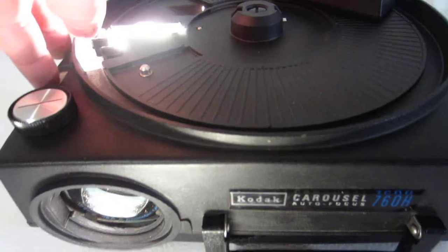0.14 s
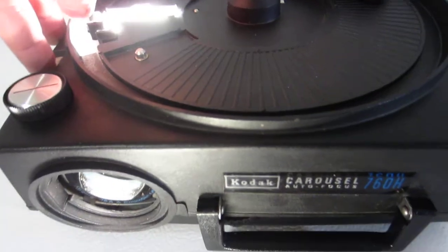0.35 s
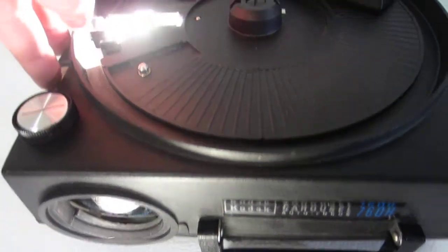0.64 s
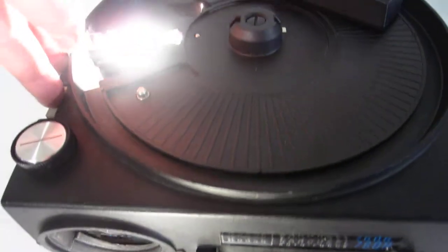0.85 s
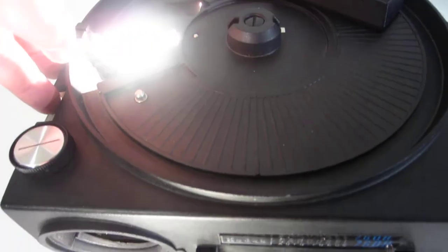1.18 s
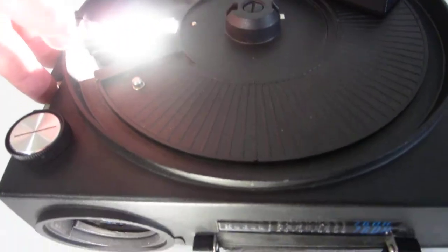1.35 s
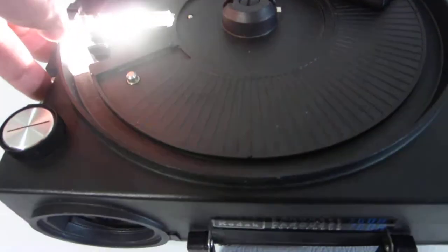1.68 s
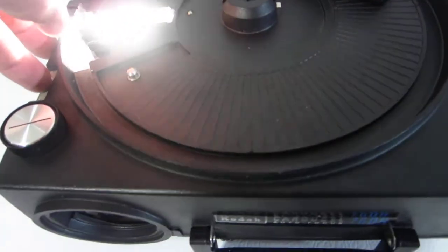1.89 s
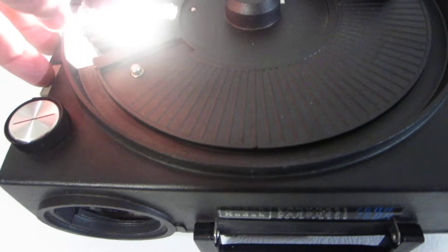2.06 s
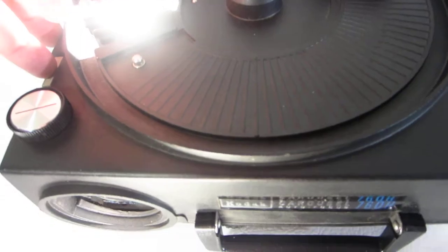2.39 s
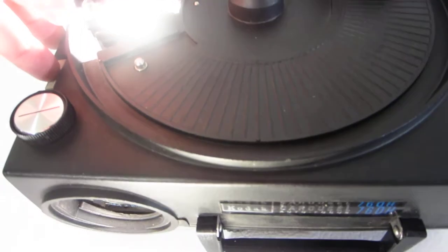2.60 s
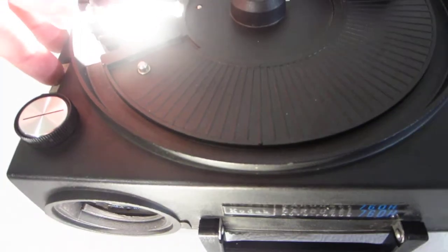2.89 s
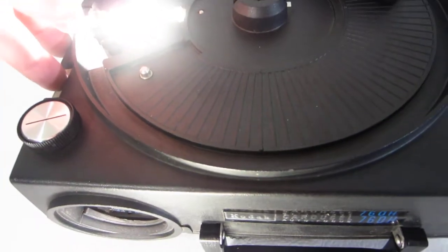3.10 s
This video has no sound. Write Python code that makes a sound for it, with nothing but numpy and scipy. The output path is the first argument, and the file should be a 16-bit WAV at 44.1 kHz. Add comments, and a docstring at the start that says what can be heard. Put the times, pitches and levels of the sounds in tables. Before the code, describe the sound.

Running slide projector with fan rush, hum and fast ticking, and two sharp slide-change clacks.

```python
"""A small room, close to a running slide projector: the fan rushes, the motor hums and the drive ticks
about 13 times a second. One slide change: the slide scrapes up its slot and the lift arm clacks, then
the tray pawl snaps, the next slide drops into the gate and a spring rings on. The linkage squeaks twice.
Each clack is a cluster of hard contacts that jolt, rattle and ring a small part."""
import sys
import numpy as np
from scipy import signal
from scipy.fft import rfft, irfft, next_fast_len
from scipy.io import wavfile
from scipy.ndimage import map_coordinates

SR = 44100
rng = np.random.default_rng(int(sys.argv[2]) if len(sys.argv) > 2 else 0)


def wav_record(signal):
    """Record a signal, one row per channel, as 16-bit PCM in the file named by sys.argv[1]."""
    frames = np.transpose(np.atleast_2d(signal))
    bounded = np.clip(frames, -1, 1)
    # unit amplitude maps onto the largest positive 16-bit level
    quanta = np.round(bounded * 32767).astype(np.int16)
    wavfile.write(sys.argv[1], SR, quanta)


N = 142884
TIME = np.arange(N) / SR
TAIL_TIME = np.arange(SR // 2) / SR  # clock of one hit or echo
HIT_SAMPLES = SR // 100


def amp(db):
    """Decibels to gain."""
    return 10 ** (np.asarray(db) / 20)


def unit(x):
    """Scale to rms 1."""
    return x / np.sqrt(np.mean(x ** 2) + 1e-20)


def unit_hit(x):
    """Scale a short sound to the energy of 10 ms at rms 1."""
    return x * np.sqrt(HIT_SAMPLES / np.sum(x ** 2))


def along(points, hz):
    """Read a curve of (frequency, value) points on a log axis."""
    freqs, values = np.transpose(points)
    return np.interp(np.log(hz + 1), np.log(freqs + 1), values)


def wobble(rate):
    """A smooth random curve, rate knots a second."""
    return map_coordinates(rng.standard_normal(2048), [TIME * rate], mode="wrap")


def filtered(x, response):
    """EQ x with a gain that is a function of frequency."""
    size = next_fast_len(N + SR // 2)
    return irfft(rfft(x, size) * response(np.fft.rfftfreq(size, 1 / SR)), size)[..., :N]


def impulse(colour, dull_hz=SR, size=4096):
    """A minimum-phase click with this colour, rolled off above dull_hz."""
    hz = np.fft.rfftfreq(size, 1 / SR)
    cepstrum = irfft(np.log(amp(along(colour, hz)) / np.hypot(1, (hz / dull_hz) ** 2)))
    cepstrum[1:size // 2] *= 2
    cepstrum[size // 2 + 1:] = 0
    return irfft(np.exp(rfft(cepstrum)))


def add(track, start_s, x):
    """Mix x into track at start_s."""
    part = track[max(0, round(start_s * SR)):][:len(x)]
    part += x[:len(part)]


# stereo lean (frequency [Hz], left over right [dB])
BALANCE = [(110, 1), (400, -1.6), (750, -2), (1290, 0.3), (2200, 2.5), (4400, 3), (9000, 3)]
def placed(x):
    """Pan by frequency: treble leans to the left, the low mids to the right."""
    return filtered(x, lambda hz: amp(along(BALANCE, hz) * np.array([[.5], [-.5]])))


# stereo focus of the noise (frequency [Hz], left-right correlation [ratio])
CORRELATION = [(60, 0.5), (130, 0.094), (290, 0.8), (640, 0.97), (1410, 0.72), (3100, 0.44), (6820, 0.21)]
def rush(colour):
    """Coloured stereo noise of rms 1, wide in some bands and centred in others."""
    def mid_side_gains(hz):
        angle = np.arccos(np.clip(along(CORRELATION, hz), -1, 1)) / 2
        return amp(along(colour, hz)) * [np.cos(angle), np.sin(angle)]
    mid, side = filtered(rng.standard_normal((2, N)), mid_side_gains)
    return unit(np.array([mid + side, mid - side]))


# the room's decay (frequency [Hz], t60 [s])
ROOM_DECAY = [(200, .4), (1500, .46), (3500, .24), (12000, .15)]
def room(x, width=.36, rise_s=.009):
    """Short reverb of the small room: the treble dies first."""
    hz, t, noise = signal.stft(rng.standard_normal((2, len(TAIL_TIME))), SR, nperseg=256)
    decay = amp(-60 * t / along(ROOM_DECAY, hz)[:, None])
    echoes = signal.istft(noise * decay, SR, nperseg=256)[1][:, :len(TAIL_TIME)]
    mid, side = echoes * (1 - np.exp(-TAIL_TIME / rise_s))
    tail = np.array([mid + width * side, mid - width * side])
    return signal.fftconvolve(x[None], tail / np.linalg.norm(tail[0]), axes=1)[:, :N]


def housing_resonances(x, ripple_db=2.5, spacing_hz=44.37):
    """The housing's many narrow resonances colour the sound with peaks and dips."""
    knots = rng.standard_normal(2048)
    ripple = lambda hz: amp(ripple_db * map_coordinates(knots, [hz / spacing_hz], mode="wrap"))
    return unit(filtered(x, ripple))


# the fan's low rush and the hiss on top (frequency [Hz], level [dB])
AIR_COLOUR = [(22, -23), (45, -21), (70, -16.5), (108, -8.5), (200, -9), (345, -4.5), (500, -1),
              (600, -4.5), (850, -5), (1350, -12.5), (1550, -22), (3400, -120)]
HISS_COLOUR = [(1000, -27), (1550, 0.5), (1950, 3.5), (2400, -4.5), (3100, -9.5), (3800, -13), (5000, -20),
               (7600, -20), (9000, -29), (11000, -37.5)]
def fan(air_db=-38, hiss_db=-52, flutter_db=.4):
    """A bed of fluttering air, with a thin hiss coloured by the housing."""
    air = amp(air_db + flutter_db * wobble(24.43)) * rush(AIR_COLOUR)
    hiss = amp(hiss_db) * housing_resonances(rush(HISS_COLOUR))
    return placed(air + hiss)


# motor and fan tones (frequency [Hz], level [dB])
HUM_TONES = [(42.5, -63), (106, -62.5), (241, -53.5), (296, -58), (351, -54), (418, -51.5), (481, -52),
             (838, -53)]
def motor_hum(waver_db=2.5, drift_rad=1.06, top_flutter_rad=.55):
    """Motor and fan hum in slightly unsteady tones; the higher ones flutter more."""
    hum = np.zeros(N)
    for hz, db in HUM_TONES:
        rms = amp(db + waver_db * wobble(5.96))
        phase = 2 * np.pi * (hz * TIME + rng.random()) + drift_rad * wobble(7.26)
        flutter = top_flutter_rad * hz / HUM_TONES[-1][0] * wobble(30.05)
        hum += rms * np.sqrt(2) * np.sin(phase + flutter)
    return placed(hum)


# the drive's pulse (time [s], level [dB])
TICKS = [(0.0084, -36.5), (0.0826, -37), (0.1598, -39), (0.242, -39.5), (0.3185, -37), (0.394, -38),
         (0.465, -38.5), (0.539, -39.5), (0.62, -41), (0.6989, -37.5), (0.7739, -38), (0.849, -40.5),
         (0.9224, -42), (0.999, -43), (1.0775, -40.5), (1.1536, -38.5), (1.2286, -40.5), (1.3026, -42),
         (1.3765, -42), (1.535, -41), (1.6092, -38), (1.685, -40.5), (1.7594, -41.5), (1.835, -41.5),
         (1.912, -40.5), (1.9885, -38.5), (2.0641, -38.5), (2.214, -39.5), (2.288, -41.5), (2.367, -40.5),
         (2.4448, -38.5), (2.5207, -39.5), (2.597, -40), (2.671, -42), (2.747, -44), (2.8247, -41),
         (2.9007, -38), (2.9756, -38.5), (3.051, -42.5), (3.123, -43), (3.1993, -42.5)]
# touch, strike and bounce within a tick (delay [s], level [dB])
TICK_CONTACTS = [(-.0014, -13), (0, 0), (.0022, -7)]
# a tick's knock and its bright rattle (frequency [Hz], level [dB])
KNOCK_COLOUR = [(500, -24), (1900, -5), (2600, 4.5), (3150, 6), (3650, -10), (7000, -55)]
RATTLE_COLOUR = [(1500, -28), (4200, -1.5), (5600, 5.5), (7300, -3), (8000, -10.5), (8900, -6),
                 (10000, -19.5), (15500, -38)]
# the ticks start a little duller (time [s], rattle trim [dB])
RATTLE_TRIM = [(.5, -5.5), (.8, -2.5)]
def drive(rattle_t60=.005, scatter_s=.0079, scatter_width_s=.0059, left_over_right_db=4.5):
    """A dry tick once a turn: the same knock with an ever-changing rattle, echoing inside the housing."""
    ticks = np.zeros(N)
    knock = amp(-7) * unit_hit(impulse(KNOCK_COLOUR))
    fizz = impulse(RATTLE_COLOUR)
    t = TAIL_TIME[:len(fizz)]
    for start, db in TICKS:
        rattle_gain = amp(-17.5 + np.interp(start, *np.transpose(RATTLE_TRIM)))
        for delay, contact_db in TICK_CONTACTS:
            force = rng.standard_normal(len(t)) * amp(-60 * t / rattle_t60)
            rattle = unit_hit(signal.fftconvolve(force, fizz)[:len(t)])
            tick = amp(db + contact_db) * (knock + rattle_gain * rattle)
            walls = rng.standard_normal(len(t)) * np.exp(-((t - scatter_s) / scatter_width_s) ** 2)
            at = start + delay * (1 + rng.normal(0, .04))
            add(ticks, at, tick)
            add(ticks, at, amp(-8) * signal.fftconvolve(tick, walls / np.linalg.norm(walls)))
    pan = amp([[left_over_right_db / 2], [-left_over_right_db / 2]])
    return (ticks + amp(-19) * room(ticks)) * pan


# swell of the scrape (time [s], level [dB])
SCRAPE_ENVELOPE = [(1.33, -71), (1.40, -60), (1.46, -54), (1.50, -91), (1.58, -72)]
# its papery tone (frequency [Hz], level [dB])
SCRAPE_COLOUR = [(500, -3), (2000, 2), (6000, 9.5), (9000, -1), (11000, -25)]
def slide_scrape():
    """The slide rubs up its slot with a faint, bright friction noise."""
    envelope = amp(np.interp(TIME, *np.transpose(SCRAPE_ENVELOPE), left=-120, right=-120))
    return placed(envelope * rush(SCRAPE_COLOUR))


# pivot squeaks (time [s], pitch [Hz], level [dB])
SQUEAKS = [(1.326, 1530, -33.5), (1.848, 1610, -34)]
def linkage_squeaks(width_s=.0039):
    """A pivot in the linkage squeaks: tiny blips of rough tone."""
    squeaks = np.zeros(N)
    for centre, hz, db in SQUEAKS:
        envelope = amp(db) * np.exp(-.5 * ((TIME - centre) / width_s) ** 2)
        squeaks += envelope * np.sin(2 * np.pi * hz * TIME + .5 * wobble(270))
    return placed(squeaks + amp(-15) * room(squeaks))


def spring(start_s=2.168, hz=4188, db=-52, t60=.76):
    """A spring rings on after the drop: one thin, high ping."""
    age = np.maximum(TIME - start_s, 0)
    return placed(amp(db - 60 * age / t60) * np.sin(2 * np.pi * hz * age))


def housing_scatter(x, spread=.6, above_hz=3500, t60=.015):
    """Scatter off the housing widens the treble."""
    walls = rng.standard_normal(len(TAIL_TIME)) * TAIL_TIME * amp(-60 * TAIL_TIME / t60)
    scatter = signal.fftconvolve(x, walls / np.linalg.norm(walls))[:N]
    side = spread * filtered(scatter, lambda hz: 1j * hz / (above_hz + 1j * hz))
    return np.array([x + side, x - side])


def clacks(contacts, colour, modes, jolt_db, ring_db, low_cut_hz=240):
    """Each contact is a jolt and a fast-dying rattle, and rings the part's modes."""
    hits = np.zeros(N)
    t = TAIL_TIME
    for start, db, rattle_t60, dull_hz in contacts:
        force = unit_hit(rng.standard_normal(len(t)) * amp(-60 * t / rattle_t60))
        force[0] += amp(jolt_db) * np.sqrt(HIT_SAMPLES)
        crack = unit_hit(signal.fftconvolve(force, impulse(colour, dull_hz))[:len(t)])
        ring = np.zeros(len(t))
        for hz, mode_db, t60 in modes:
            envelope = amp(mode_db + rng.normal(0, 1.3) - 60 * t / t60)
            ring += envelope / np.hypot(1, (hz / dull_hz) ** 2) * np.sin(2 * np.pi * hz * t)
        add(hits, start, amp(db) * (crack + amp(ring_db) * ring))
    # small parts radiate no bass
    hits = filtered(hits, lambda hz: (1j * hz / (low_cut_hz + 1j * hz)) ** 2)
    return placed(housing_scatter(hits) + amp(-12.5) * room(hits))


# pawl hits (time [s], level [dB], rattle t60 [s], dull above [Hz])
PAWL_HITS = [(1.4295, -49, .012, 20000), (1.5735, -44, .025, 8000), (2.1396, -32, .015, 18000),
             (2.141, -28.5, .04, 15000), (2.1668, -37, .008, 15000)]
# their crisp crack (frequency [Hz], level [dB])
PAWL_COLOUR = [(150, -23), (490, 9), (700, -3), (1000, 7), (2050, 3), (2700, -2), (4200, -7), (5700, 1),
               (8500, -8), (10300, -17), (15500, -26)]
# the pawl's ring (frequency [Hz], level [dB], t60 [s])
PAWL_MODES = [(950, -4, .05), (7700, -9, .025)]
def tray_pawl():
    """The tray pawl clicks lightly twice, then catches with a bright snap."""
    return clacks(PAWL_HITS, PAWL_COLOUR, PAWL_MODES, jolt_db=-8, ring_db=3.5)


# slide hitting the gate (time [s], level [dB], rattle t60 [s], dull above [Hz])
GATE_HITS = [(2.0815, -28, .028, 5000), (2.1675, -22.5, .018, 6500), (2.172, -29.5, .02, 3000),
             (2.1785, -26.5, .03, 2400), (2.1905, -31, .012, 1000), (2.1995, -30.5, .012, 800)]
# its hollow crack (frequency [Hz], level [dB])
GATE_COLOUR = [(100, -28), (330, -17.5), (510, 6.5), (900, -10), (1200, -2), (2050, -10.5), (2700, -17.5),
               (4000, -20), (6000, -22.5), (9000, -26.5), (11000, -45)]
# the gate's ring (frequency [Hz], level [dB], t60 [s])
GATE_MODES = [(500, -7, .06), (1200, -12, .08)]
def slide_drop():
    """The next slide lands in the gate with a clunk and chatters to rest."""
    return clacks(GATE_HITS, GATE_COLOUR, GATE_MODES, jolt_db=-11, ring_db=-1)


# lift arm hits (time [s], level [dB], rattle t60 [s], dull above [Hz])
LIFT_HITS = [(1.3225, -34.5, .03, 3600), (1.4275, -27, .012, 600), (1.449, -31, .12, 6000),
             (1.4635, -28, .0088, 3000), (1.4658, -19, .022, 14000), (1.469, -17.8, .028, 6000),
             (1.4728, -21.5, .025, 7000), (1.4765, -25, .02, 8000), (1.481, -28.5, .02, 2600),
             (1.497, -31.5, .12, 1800), (1.5735, -32.5, .03, 2300), (1.581, -30, .012, 900),
             (1.5875, -31.5, .01, 750)]
# their boxy crack (frequency [Hz], level [dB])
LIFT_COLOUR = [(100, -25), (290, -17), (430, 2), (560, 5), (830, -1), (980, -8), (1380, 1), (1700, -13),
               (2000, -5.5), (2350, -16), (2900, -12.5), (5500, -22.5), (8500, -30), (10500, -43),
               (15500, -45)]
# the arm's ring (frequency [Hz], level [dB], t60 [s])
LIFT_MODES = [(530, 0, .07), (665, -7, .08), (812, -4, .08), (1085, -9, .08), (1385, -4, .08),
              (1962, -8, .07)]
def lift_arm():
    """The lift arm swings up: a tight run of contacts makes the loudest clack."""
    return clacks(LIFT_HITS, LIFT_COLOUR, LIFT_MODES, jolt_db=-10, ring_db=-6)


def scene():
    """One slide change over the bed of the running machine."""
    hits = lift_arm() + slide_drop() + tray_pawl()
    bed = fan() + motor_hum() + drive()
    return bed + slide_scrape() + linkage_squeaks() + spring() + hits


def record(dry):
    """The microphone has a notch in the treble; nothing is kept above the band limit."""
    notch_hz, width_hz, notch_db, top_hz = 12200, 500, -17, 15900
    notch = lambda hz: amp(notch_db * np.exp(-.5 * ((hz - notch_hz) / width_hz) ** 2))
    return filtered(dry, lambda hz: notch(hz) * (hz < top_hz))


dry = scene()
out = record(dry)
wav_record(out)
```